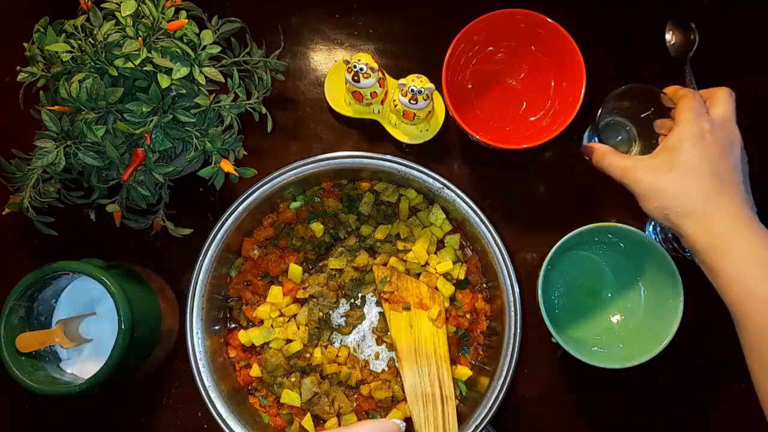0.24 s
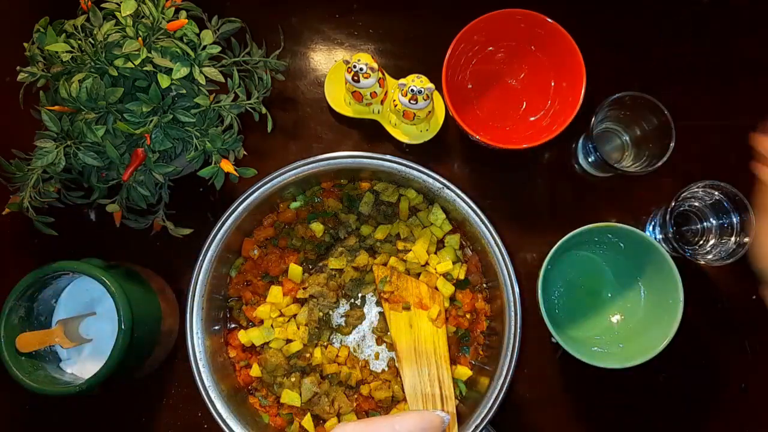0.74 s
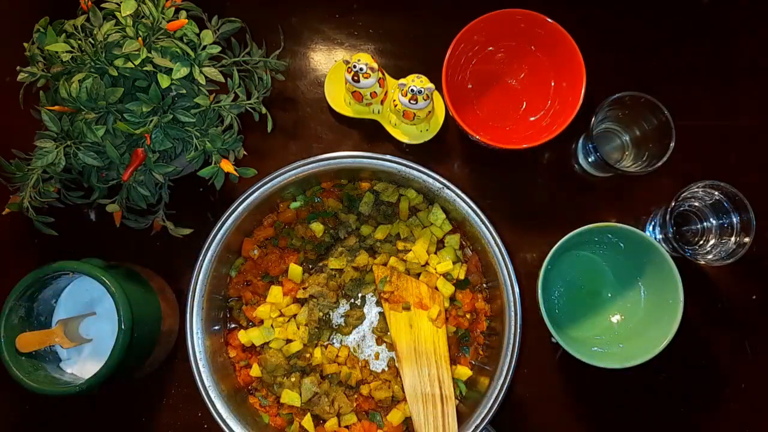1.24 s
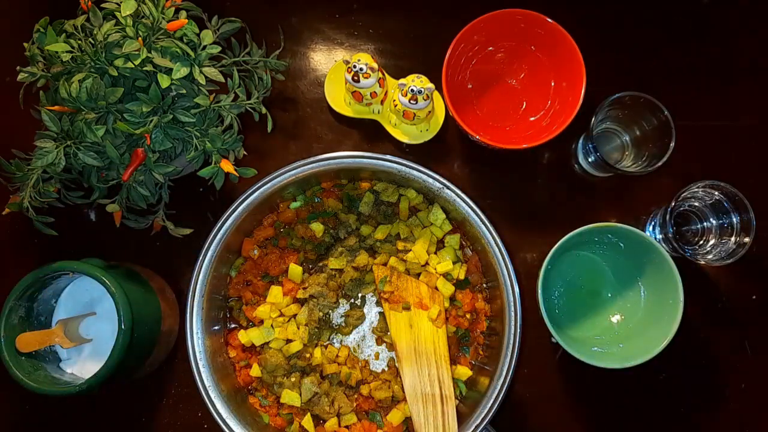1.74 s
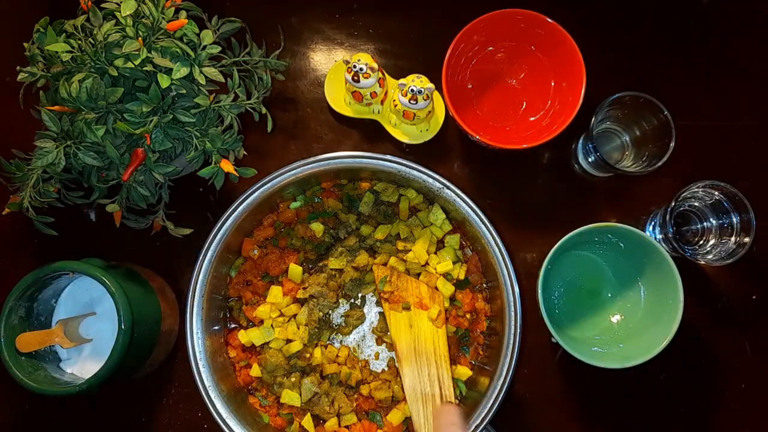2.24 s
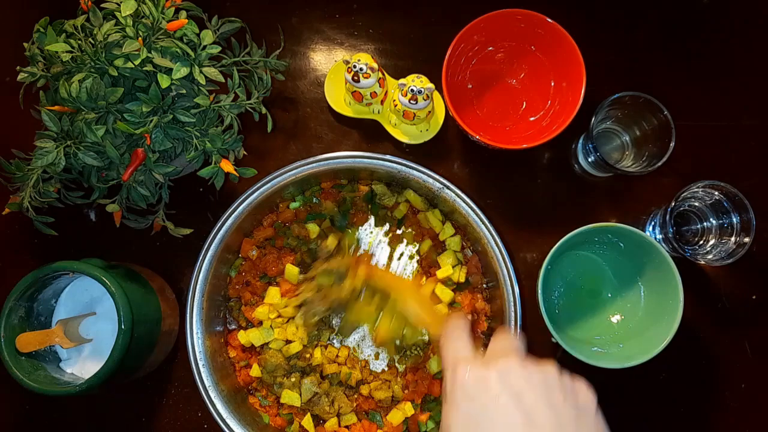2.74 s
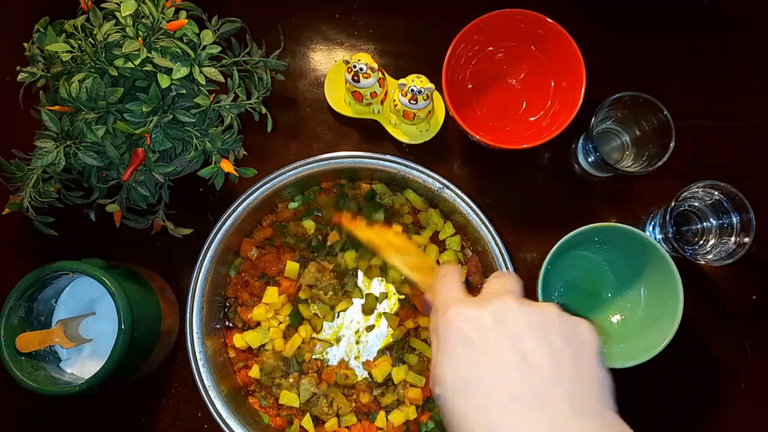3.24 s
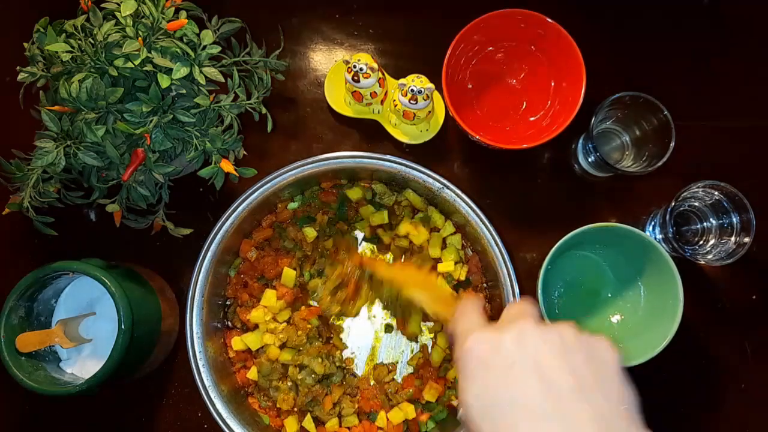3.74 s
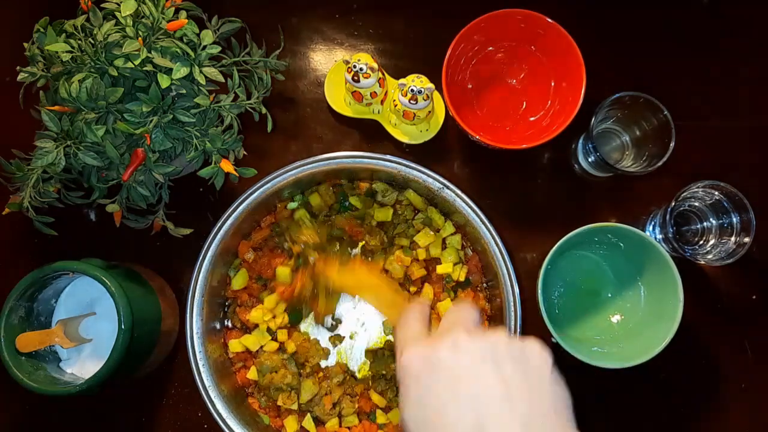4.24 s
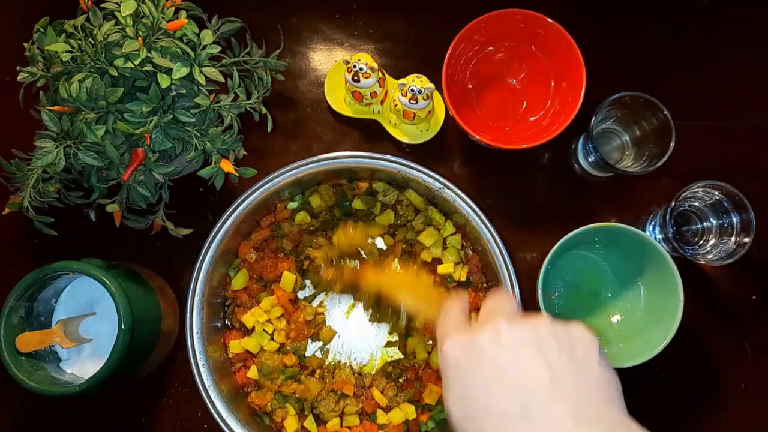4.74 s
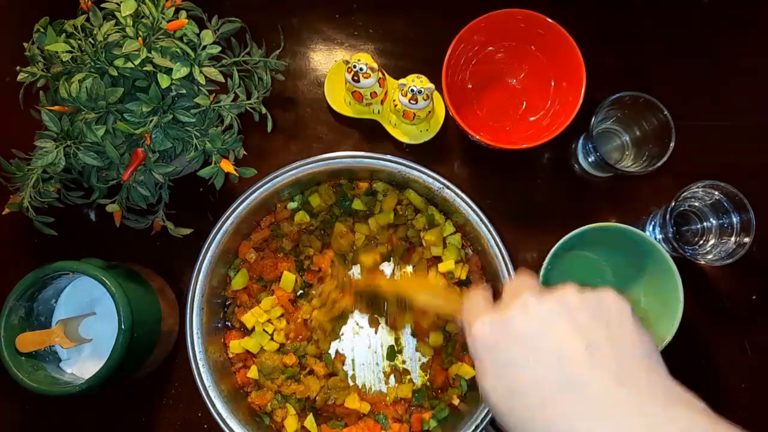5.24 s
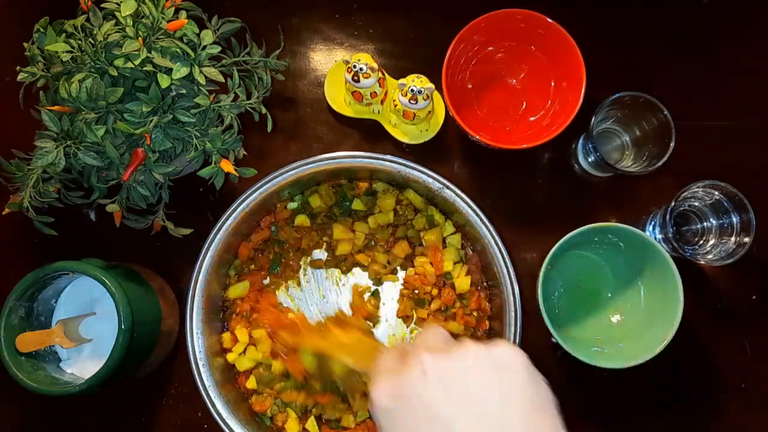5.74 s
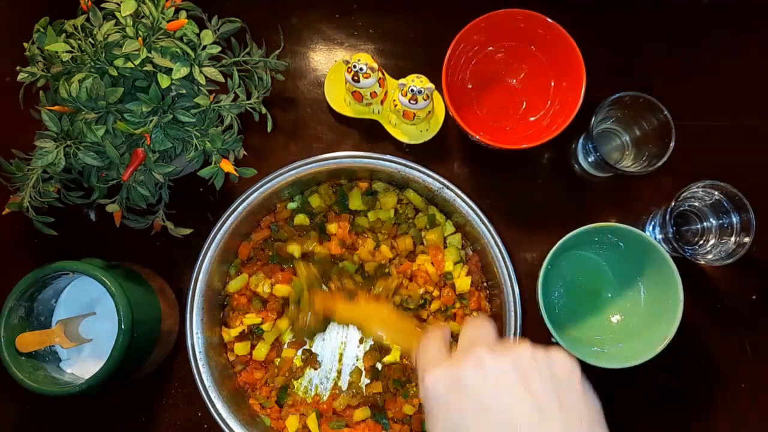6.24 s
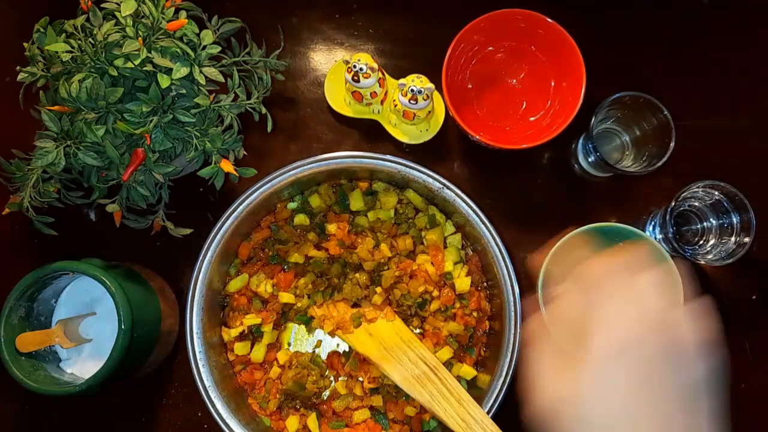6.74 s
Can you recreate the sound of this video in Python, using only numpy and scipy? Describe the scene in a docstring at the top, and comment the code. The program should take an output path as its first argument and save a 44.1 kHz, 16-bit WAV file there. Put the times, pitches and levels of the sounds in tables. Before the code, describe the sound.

In a kitchen with hard, slightly echoing walls and a faint appliance hum, a close microphone picks up a glass thudding onto a wooden table and two bright, ringing clinks of a spoon on glass. Soft, quick strokes of a wooden spatula follow, turning wet vegetable pieces in a steel bowl with scrapes, squelches and tiny ticks, until the spatula knocks on the rim with a short metallic ring.

```python
"""At a kitchen table, a glass is put down with a thud that makes the wood boom. Next a metal spoon
clinks twice on glass, close by on the left, and both ring. Then a wooden spatula stirs moist diced
vegetables in a steel bowl: it scrapes and squeaks while the pieces crackle, tick and tumble. Last,
the spatula drops against the rim and the steel rings briefly. All along an appliance hums over a
low rumble and a faint hiss, and the hard walls of the room answer every blow."""
import sys
import numpy as np
from scipy import signal
from scipy.fft import rfft, irfft, next_fast_len
from scipy.io import wavfile
from scipy.ndimage import uniform_filter1d, map_coordinates

SR = 44100
rng = np.random.default_rng(int(sys.argv[2]) if len(sys.argv) > 2 else 0)


def to_wav(sig):
    """Store sig (one row per channel, or 1-D mono) as 16-bit WAV at the path in sys.argv[1].

    Samples outside -1..1 are clipped; the rate is SR.
    """
    pcm = np.clip(np.atleast_2d(sig), -1, 1) * 32767
    pcm = np.round(pcm).astype(np.int16)
    wavfile.write(sys.argv[1], SR, pcm.T)  # frames by channels


N = 308700
TOP_HZ = 16300  # upper edge of the treble
AGE = np.arange(SR) / SR  # one second of time since a blow, in s

# the tones (modes) of the wooden table: f/Hz, relative level/dB, t60/s (time to fade by 60 dB)
WOOD_MODES = [(135, -3, 0.18), (206, -11.5, 0.28), (253.6, -3.5, 0.25), (298, -7, 0.35), (421, -0.5, 0.18),
              (616, -10, 0.073), (690, -4.5, 0.15), (870, -13, 0.12)]
# spatula strokes and their relative levels: start/s, length/s, scrape/dB, wet crackle/dB, tumble/dB
STROKES = [(2.797, 0.16, -71.5, -72, -88), (3.101, 0.19, -74.5, -72.5, -93), (3.391, 0.16, -72.5, -72, -83),
           (3.627, 0.077, -70, -68.5, -82), (3.875, 0.042, -61.5, -60, -72.5),
           (4.097, 0.085, -67, -67.5, -80.5), (4.315, 0.039, -63, -73.5, -80.5),
           (4.396, 0.032, -67, -68.5, -88), (4.581, 0.1, -71, -67, -81.5), (4.82, 0.085, -61.5, -65, -80.5),
           (5.051, 0.14, -67, -63.5, -79.5), (5.345, 0.21, -67, -66, -81.5),
           (5.766, .15, -67.5, -66.5, -77), (6.064, .05, -75, -72, -85), (6.134, 0.13, -62.5, -66, -80.5),
           (6.327, 0.071, -63.5, -64, -84), (6.533, 0.15, -72.5, -69, -88)]


def glass_down():
    """The thick base hits the table top, which booms; the glass rattles, then sings faintly."""
    # the glass lands and settles: t/s, relative thud level/dB, relative ring level/dB
    landings = [(0.4795, -2.5, -35.5), (0.4834, 2, -31.5), (0.493, -6, -18.5), (0.508, -13.5, -25)]
    # spectrum (strength at each pitch) of glass hitting wood: f/Hz, level/dB
    thud_spectrum = [(30, -36.5), (60, -20.5), (120, -7), (260, -7.5), (400, -7.5), (650, 0), (1000, -8),
                     (1700, -8.5), (2600, -14), (4000, -26), (4800, -23), (7400, -35), (9800, -32.5),
                     (14200, -33.5), (16000, -47)]
    out = np.zeros((2, N))
    held = [(hz, db, t60 * .35) for hz, db, t60 in glass_modes(place=0.5)]  # fingers damp the glass
    for s, thud_db, glass_db in landings:
        thud = amp(thud_db - 21) * burst(thud_spectrum, t60=0.032)
        add(out, s, in_room(thud, room_db=-1, left_db=3))
        add(out, s, in_room(amp(glass_db + 1) * ring(held), room_db=-2, left_db=7.5))
    add(out, landings[0][0], amp(-26) * ring(WOOD_MODES, rise=.004))
    add(out, .89, amp(-66) * ring([(1640, 0.0013, .45)], rise=.1))  # a faint tone as the hand lets go
    return out


def clinks():
    """Spoon and glass crack and ring with each contact; the table carries a dull knock."""
    # spoon hits, with relative levels:
    # t/s, ring/dB, crack/dB, table knock/dB, place struck (0 to 1), left over right/dB, echo/dB
    hits = [(1.346, 3, -9.5, -44.5, 0.13, 5, -9), (1.358, -12, -22, -30, 0.01, 6.5, -2.5),
            (1.368, -24.5, -15.5, -43, 0.17, -6.5, -3.5), (1.863, -1, -16, -53.5, 0.92, 12, -4.5),
            (1.872, -7.5, -15, -51, 0.92, 15.5, -7.5)]
    # spectrum of metal meeting glass: f/Hz, level/dB
    crack_spectrum = [(100, -16.5), (400, -10), (900, -12.5), (1500, -15), (2700, -5), (4400, -5.5),
                      (5700, -6.5), (7500, -0.5), (9000, -8.5), (10500, 1), (13000, -6), (15000, -4.5),
                      (17000, -18.5)]
    # spectrum of a dull bump close by on the left: f/Hz, level/dB
    bump_spectrum = [(25, -20), (55, -1.5), (180, 0), (330, -10.5), (700, -16.5), (2000, -44),
                     (5000, -81.5)]
    out = np.zeros((2, N))
    for s, ring_db, crack_db, knock_db, place, left_db, room_db in hits:
        ringing = amp(ring_db) * ring(glass_modes(place))
        crack = amp(crack_db - 8.5) * burst(crack_spectrum, t60=0.029)
        add(out, s, in_room(ringing + crack, room_db=room_db, left_db=left_db))
        # the crack also spreads away from the listener and comes back off the walls
        outgoing = amp(crack_db - 16) * burst(crack_spectrum, t60=0.014)
        add(out, s, in_room(outgoing, room_db=10.5, left_db=9.5))
        add(out, s, amp(knock_db - 3.5) * ring(WOOD_MODES, rise=0.0046))
    bump = amp(-18.5) * burst(bump_spectrum, t60=0.03)
    add(out, 1.864, in_room(bump, room_db=-23, left_db=24))
    return out


def glass_modes(place):
    """Where the glass is struck (place, 0 to 1) decides how strongly each tone rings."""
    # tones of spoon and glass: f/Hz, t60/s, relative level at place 0/dB, at place 1/dB
    modes = [(2807, 0.13, -31, -34.5), (2865, 0.16, -25.5, -43.5), (3387, 0.12, -41, -26),
             (4540, 0.06, -21, -38.5), (4710, 0.16, -27, -31), (4790, 0.25, -28, -41),
             (4800, .05, -27.5, -40), (6260, .16, -29, -29), (7010, 0.1, -18.5, -38.5),
             (7090, 0.063, -20.5, -38.5), (7980, 0.16, -35.5, -31), (8270, .1, -14.5, -30.5),
             (9740, 0.1, -30.5, -26.5), (9750, 0.11, -27, -8.5), (9920, 0.071, -31.5, -22.5),
             (10080, .1, -20.5, -27.5), (11260, .085, -12, -31), (11380, .04, -24, -30.5),
             (11650, 0.094, -33.5, -18.5), (12900, .14, -30.5, -32), (13060, 0.1, -39, -24.5),
             (13960, 0.1, -36, -18.5), (14300, 0.1, -15.5, -36.5), (15400, .08, -25, -23.5),
             (15200, .06, -27, -38)]
    return [(hz, np.interp(place, [0, 1], [first, second]), t60) for hz, t60, first, second in modes]


def stirring():
    """Each stroke scrapes the steel, tumbles the pieces and pulls their wet faces apart in clumps."""
    # spectrum of wood rubbing on steel: f/Hz, level/dB
    scrape_spectrum = [(900, -32), (1700, -17.5), (2300, -5.5), (3300, -4.5), (4400, -0.5), (6000, -1),
                       (8000, -3.5), (15000, -7.5)]
    # spectrum of wet pieces parting: f/Hz, level/dB
    wet_spectrum = [(3000, -33.5), (5500, -10), (7500, -6.5), (10500, 3), (12500, -1), (14200, 3.5),
                    (16000, -22)]
    # spectrum of pieces rolling over: f/Hz, level/dB
    tumble_spectrum = [(50, -1.5), (130, 6.5), (280, 18), (450, -2.5), (700, 0.5), (1200, -6.5),
                       (2000, -6.5), (4000, -27)]
    # light knocks against the bowl: t/s, relative level/dB, f/Hz
    nudges = [(4.106, -47, 284), (5.109, -49, 287), (5.155, -43.5, 138)]
    scrape_gain, wet_gain, tumble_gain = stroke_gains()
    clumps = amp(2.2 * wobble(70))
    squelch = amp(-5) * pops(rate=520, hz=4700, spread=.17, cycles=1.6, spread_db=3)
    friction = amp(-4) * colour(grains(rate=1100, spread_db=3), scrape_spectrum) + squelch
    popping = amp(-1.5) * pops(rate=300, hz=11160, spread=.15, cycles=2.2, spread_db=4.5)
    juice = amp(-2.5) * colour(grains(rate=940, spread_db=3.5), wet_spectrum) + popping
    tumble = amp(5.5) * colour(grains(rate=500, spread_db=3), tumble_spectrum)
    food = clumps * (scrape_gain * friction + wet_gain * juice) + tumble_gain * tumble
    for s, db, hz in nudges:
        add(food, s, amp(db - 0.5) * ring([(hz, 0, .09)], rise=0.0023))
    swish = np.sin(np.pi * np.clip(AGE / 0.17, 0, 1)) ** 2 * rng.standard_normal((2, SR))
    hand = colour(swish, [(600, -20), (1800, -2), (3300, 5), (4500, -16), (9000, -33)])
    add(food, 2.27, amp(-81.5) * hand)  # the hand slides onto the handle
    add(food, 2.545, amp(-70.5) * colour(swish, wet_spectrum))  # the spatula lifts out of the pile
    return in_room(food, room_db=-7, left_db=-1.5)


def stroke_gains():
    """How strong scrape, wet crackle and tumbling are over time; the strongest stroke leads."""
    out = np.zeros((3, N))
    for start, length, scrape_db, wet_db, tumble_db in STROKES:
        out = np.maximum(out, amp([[scrape_db], [wet_db], [tumble_db]]) * stroke_shape(start, length))
    return out


def stroke_shape(start, length):
    """The gain of one stroke: the blade digs in, slows and stops, and the pile goes on shifting."""
    attack_s, sag_db_per_s, release_s = 0.015, 18, 0.035
    settle_db, settle_s = -12.5, 0.2
    age = np.arange(N) / SR - start
    before, during, after = np.maximum(-age, 0), np.clip(age, 0, length), np.maximum(age - length, 0)
    release = np.maximum(np.exp(-after / release_s), amp(settle_db) * np.exp(-after / settle_s))
    return np.exp(-before / attack_s) * amp(-sag_db_per_s * during) * release


def pops(rate, hz, spread, cycles, spread_db):
    """Films of juice burst, rate times a second: tiny fading tones of random pitch, size and place."""
    count = int(rate * N / SR)
    when, place = rng.random((2, count, 1))
    pitch, size, life = np.clip(rng.standard_normal((3, count, 1)), -2.5, 2.5)
    pop_hz = np.minimum(hz * np.exp(spread * pitch), TOP_HZ)
    n = np.arange(256)  # the samples of one pop
    age = n / SR * pop_hz / (cycles * np.exp(.5 * life))  # a pop is strongest at age 1
    waves = amp(spread_db * size) * np.sin(2 * np.pi * pop_hz * n / SR) * age * np.exp(-age)
    left = (when * N).astype(int) + n
    right = left + (place * 7).astype(int)  # up to 6 samples later
    return unit(np.array([np.bincount(at.ravel(), waves.ravel(), N)[:N] for at in (left, right)]))


def grains(rate, spread_db):
    """Tiny clicks of uneven size, about rate a second; each one's place sets its left-right delay."""
    size = amp(spread_db * np.clip(rng.standard_normal(N), -2.5, 2.5)) * rng.choice([-1, 1], N)
    left = (rng.random(N) < rate / SR) * size
    place = rng.integers(0, 9, N)
    right = sum(np.roll(left * (place == k), k - 1) for k in range(9))
    return unit(np.array([left, right]))


def spatula_down():
    """Wood cracks on the rim; the food in the bowl quickly quiets the ringing steel."""
    # the spatula falls and bounces: t/s, relative level/dB
    drops = [(6.745, -0.5), (6.7668, -8)]
    # spectrum of wood hitting the rim: f/Hz, level/dB
    crack_spectrum = [(120, -21.5), (230, -19), (366, -7), (623, -12.5), (1100, -13.5), (1650, -17.5),
                      (2300, -8), (3600, -18.5), (5040, -9.5), (5700, -13.5), (10000, -15), (14000, -28),
                      (16000, -54)]
    # tones of the steel bowl: f/Hz, relative level/dB, t60/s
    bowl_modes = [(371, 3.5, 0.15), (512, -8.5, 0.16), (964, -10, 0.53), (1102, -7, 0.093),
                  (1259, -7, 0.14), (2352, -14, 0.21), (3338, -10.5, 0.33), (4120, 1.5, 0.18),
                  (4201, 1, 0.2), (4335, -1, 0.17), (4608, 10, 0.14), (5053, 5.5, 0.13), (5604, -14, 0.23),
                  (7585, -9, .08)]
    out = np.zeros((2, N))
    for s, db in drops:
        crack = amp(db - 23.5) * burst(crack_spectrum, t60=0.027)
        add(out, s, in_room(crack, room_db=-3.5, left_db=-1.5))
        steel = amp(db - 37.5) * ring(bowl_modes, rise=0.015)
        add(out, s, in_room(steel, room_db=-7.5, left_db=-3.5))
    return out


def ticks():
    """Single pieces snap apart or tick on the steel: a click with a very brief pitch."""
    # the sharpest ticks of the pieces: t/s, relative level/dB, f/Hz
    sharp_ticks = [(2.4765, -58, 2690), (2.794, -45, 12270), (3.1174, -33, 13700), (3.4176, -38.5, 9830),
                   (3.6321, -40.5, 9400), (3.8756, -47, 3010), (4.2961, -37.5, 10800), (4.6942, -37, 9870),
                   (4.8085, -40.5, 9900), (4.9092, -36, 11700), (4.9806, -34.5, 12740), (5.045, -41, 10000),
                   (5.2664, -38.5, 12340), (5.2959, -40.5, 11000), (6.2487, -38, 11600),
                   (6.3634, -31, 12600), (6.485, -39, 9600), (6.5066, -41.5, 12860), (6.576, -40, 10450),
                   (6.6348, -40.5, 11800)]
    out = np.zeros((2, N))
    for s, db, hz in sharp_ticks + stray_ticks():
        click = burst([(hz / 6, -22), (hz * .6, -9), (hz, 0), (hz * 1.5, -7)], t60=.005)
        snap = click + 2 * ring([(hz, 0, .004)], rise=.0002)
        add(out, s, amp(db - 1.5) * snap / np.abs(snap).max())
    return in_room(out, room_db=-3, left_db=2)


def stray_ticks():
    """Pieces drop at random during and just after strokes: rows of t/s, relative level/dB, f/Hz."""
    per_second, late_s = 9, .09
    middle_db, scatter_db, middle_hz = -47.5, 3, 10500
    chance = rng.random((200, 3))
    times = np.cumsum(-np.log(1 - chance[:, 0])) / per_second  # random waits, added up
    return [(s, middle_db + scatter_db * (2 * size - 1), middle_hz * 2 ** (pitch - .5))
            for s, (_, size, pitch) in zip(times, chance)
            if any(start < s < start + length + late_s for start, length, *_ in STROKES)]


def squeaks():
    """The blade sticks and slips for an instant: a narrow, rough tone."""
    # the wood catches on the steel: t/s, relative level/dB, f/Hz, t60/s
    catches = [(2.905, -64.5, 539, 0.085), (3.099, -68, 3270, 0.054), (3.418, -60.5, 3200, .03),
               (3.539, -61, 5160, 0.037), (3.876, -48, 3020, 0.033), (4.093, -59, 3495, .035),
               (4.108, -53, 3900, 0.037), (4.319, -57.5, 4420, 0.037), (4.596, -49.5, 4460, 0.029),
               (5.041, -70.5, 2190, 0.22), (5.777, -74.5, 2094, 0.47), (6.205, -72.5, 2270, .2),
               (6.211, -59, 4500, 0.032), (6.351, -57.5, 3850, .035)]
    out = np.zeros((2, N))
    for s, db, hz, t60 in catches:
        spectrum = [(hz / 4, -26), (hz * .8, -18), (hz, 0), (hz * 1.25, -14), (hz * 3, -32)]
        add(out, s, amp(db + 2) * burst(spectrum, t60))
    return in_room(out, room_db=-9.5, left_db=-0.5)


def in_room(x, room_db, left_db):
    """The direct sound, left_db stronger on the left, plus wall echoes whose bass lasts longest."""
    # how long the room rings: f/Hz, t60/s
    decay_times = [(100, 0.73), (600, 0.5), (1600, 0.43), (4000, 0.38), (8000, 0.29), (15000, 0.35)]
    # spectrum of what the walls send back: f/Hz, level/dB
    wall_spectrum = [(300, 3.5), (4000, 0.5), (9000, -3.5), (15000, -6.5)]
    hz, t, bands = signal.stft(diffuse(rng.standard_normal((2, SR))), SR, nperseg=256)
    decay = amp(-60 * t / along(decay_times, hz)[:, None])
    tail = signal.istft(bands * decay, SR, nperseg=256)[1][:, :SR]
    near_walls = 1 + amp(3) * fade(t60=.065)
    build_up = 1 - np.exp(-AGE / 0.0026)
    tail *= near_walls * build_up
    tail = colour(even(tail, width_hz=40), wall_spectrum)
    tail /= np.sqrt(np.sum(tail ** 2) / 2)
    echo = signal.fftconvolve(x[:1], tail, axes=1)[:, :x.shape[1]]
    return x * amp([[0], [-left_db]]) + amp(room_db) * echo


def background():
    """Room rumble, an appliance's wavering hum and microphone hiss; rumble and hiss rise and dip."""
    # strength of the rumble over time: t/s, level/dB
    rumble_levels = [(0, -61.5), (.65, -58), (1.8, -60), (2.15, -68.5), (3.0, -66.5), (3.3, -61),
                     (4.25, -58.5), (5.7, -63.5), (6.1, -60.5), (7, -59.5)]
    # spectrum of the rumble: f/Hz, level/dB
    rumble_spectrum = [(12, -41), (20, -16), (80, -3.5), (182, -6.5), (206, -17.5), (240, -1), (270, -18.5),
                       (408, -20.5), (484, -13.5), (518, -27.5), (1200, -42.5), (1560, -75), (2640, -120)]
    # tones of the appliance: f/Hz, level/dB
    hum_tones = [(96.9, -73.5), (140, -77.5), (242.2, -80), (484.5, -80)]
    # spectrum of the hiss: f/Hz, level/dB
    hiss_spectrum = [(700, -2), (1200, -1.5), (3500, -2), (5500, -2.5), (8400, -7), (9500, 4.5),
                     (11000, -3), (14000, -3), (16000, -11.5)]
    t = np.arange(N) / SR
    rumble_db = np.interp(t, *np.transpose(rumble_levels))
    rumble = amp(rumble_db) * unit(colour(diffuse(rng.standard_normal((2, N))), rumble_spectrum))
    hum = np.zeros(N)
    for hz, db in hum_tones:
        peak = np.sqrt(2) * amp(db + 0.95 * wobble(5.5))
        hum += peak * np.sin(2 * np.pi * hz * t + 1.5 * wobble(6.9))
    hiss_db = -80.5 + 0.3 * (rumble_db - rumble_db.mean())
    hiss = amp(hiss_db) * colour(rng.standard_normal((2, N)), hiss_spectrum)
    return rumble + hum + hiss


def ring(modes, rise=.0005):
    """A struck object's fading tones (f/Hz, level/dB, t60/s), slightly out of step left and right."""
    lags = rng.normal(0, 0.00012, (len(modes), 1, 1)) * [[0], [1]]
    waves = sum(amp(db) * fade(t60) * np.sin(2 * np.pi * hz * (AGE + lag))
                for (hz, db, t60), lag in zip(modes, lags))
    return waves * (1 - np.exp(-AGE / rise))


def burst(spectrum, t60):
    """The short noise of two things touching, in stereo."""
    noise = diffuse(rng.standard_normal((2, SR))) * fade(t60)
    return colour(even(noise, width_hz=6 / t60), spectrum)


def diffuse(pair):
    """Blend two unrelated noises into sound from all around: left and right alike in the bass only."""
    # how alike the two sides are: f/Hz, likeness (0 to 1)
    likeness = [(60, 0.92), (350, 0.68), (700, 0.18), (1300, 0), (8000, 0.03)]
    hz = np.fft.rfftfreq(pair.shape[1], 1 / SR)
    turn = np.arccos(np.clip(along(likeness, hz), -1, 1)) / 2
    mid, side = irfft(rfft(pair) * [np.cos(turn), np.sin(turn)], pair.shape[1])
    return np.array([mid + side, mid - side])


def even(noise, width_hz):
    """Level out the chance peaks and dips in a fading noise's spectrum, and end it at 0.7 s."""
    bins = rfft(noise)
    power = np.abs(uniform_filter1d(np.mean(np.abs(bins) ** 2, axis=0), int(width_hz)))
    return irfft(bins * np.sqrt(power.mean() / (power + 1e-20)), SR) * (AGE < .7)


def colour(x, spectrum):
    """Filter x to the shape of a spectrum (f/Hz, level/dB); white noise keeps its power."""
    size = 2 * next_fast_len(x.shape[-1] // 2 + 4096)
    gain = unit(amp(along(spectrum, np.fft.rfftfreq(size, 1 / SR))))
    cepstrum = irfft(np.log(gain))[:size // 2]  # keeping one half stops sound coming before its cause
    cepstrum[1:] *= 2
    return irfft(rfft(x, size) * np.exp(rfft(cepstrum, size)))[..., :x.shape[-1]]


def along(points, hz):
    """Read between (f/Hz, value) points, with all octaves equally wide."""
    point_hz, values = np.transpose(points)
    return np.interp(np.log(hz + 1), np.log(point_hz), values)


def wobble(rate):
    """A smooth curve through rate random values a second."""
    return map_coordinates(rng.standard_normal(int(N * rate / SR) + 4), [np.arange(N) * rate / SR])


def fade(t60):
    """A gain that falls by 60 dB every t60 seconds."""
    return np.exp(-np.log(1000) * AGE / t60)


def amp(db):
    """Turn decibels into a gain to multiply by."""
    return 10 ** (np.asarray(db) / 20)


def unit(x):
    """Scale x to an average power of 1."""
    return x / np.sqrt(np.mean(x ** 2) + 1e-20)


def add(track, s, x):
    """Mix x into the track, starting at s seconds."""
    at = round(s * SR)
    track[..., at:at + x.shape[-1]] += x[..., :N - at]


def scene():
    """Everything on and around the table."""
    return glass_down() + clinks() + stirring() + squeaks() + ticks() + spatula_down() + background()


def record(dry):
    """A steep filter cuts the treble above TOP_HZ."""
    return signal.sosfilt(signal.ellip(12, .1, 90, TOP_HZ, fs=SR, output="sos"), dry)


dry = scene()
out = record(dry)
to_wav(out)
```